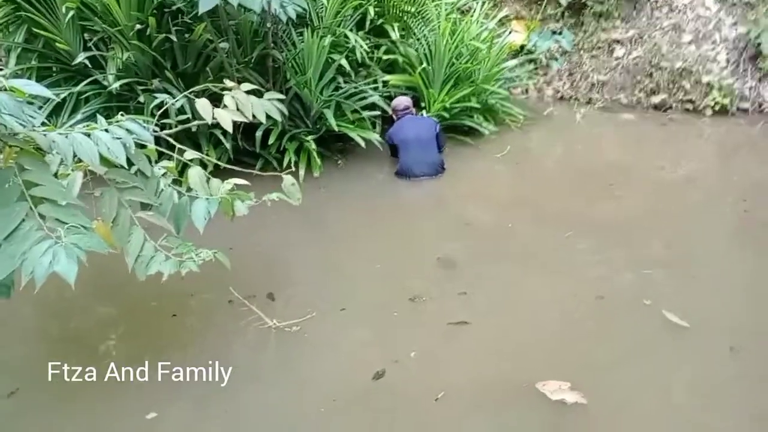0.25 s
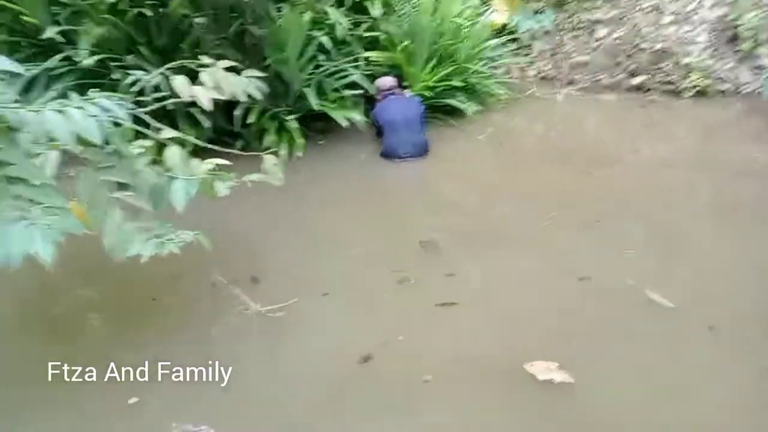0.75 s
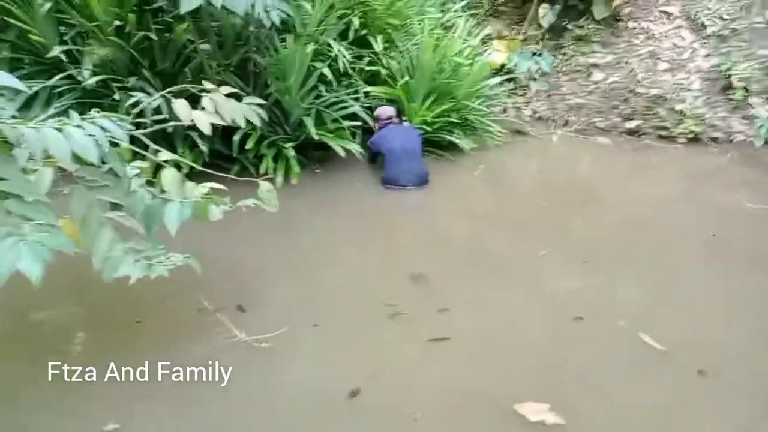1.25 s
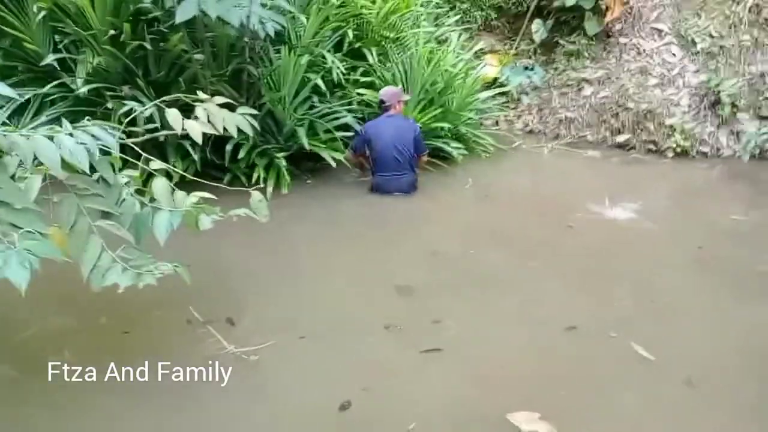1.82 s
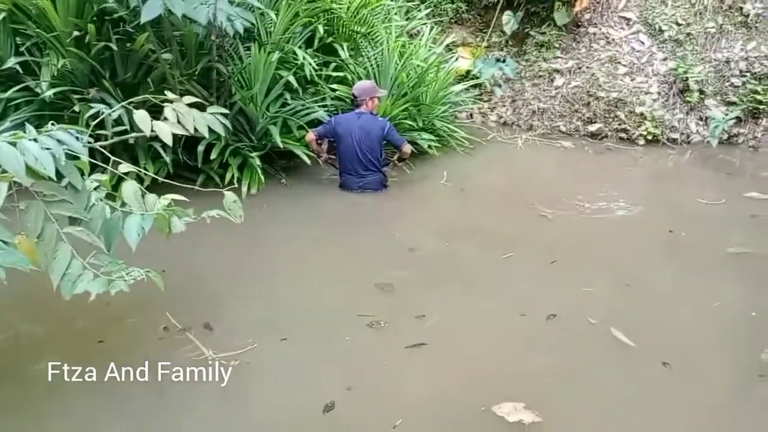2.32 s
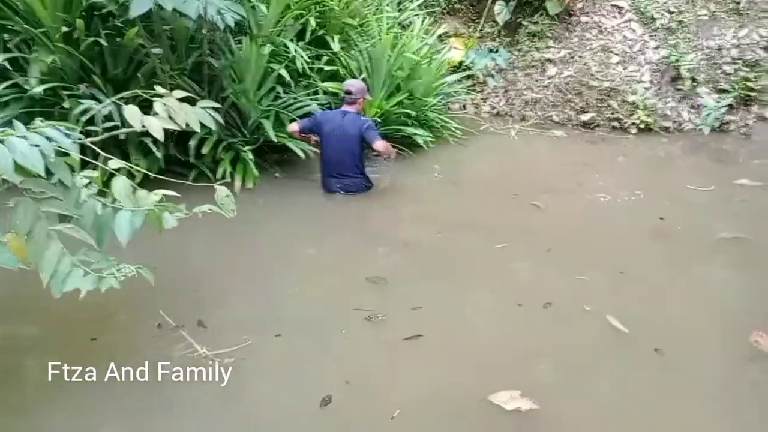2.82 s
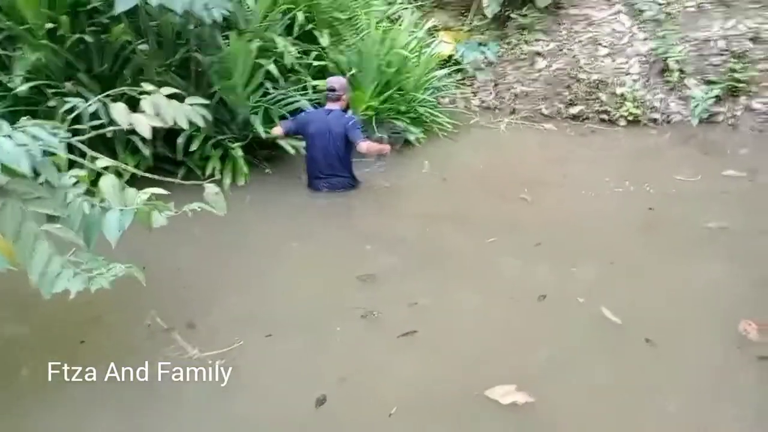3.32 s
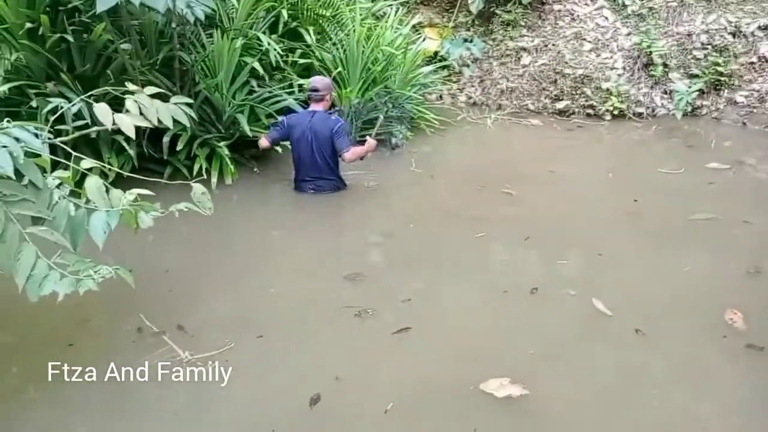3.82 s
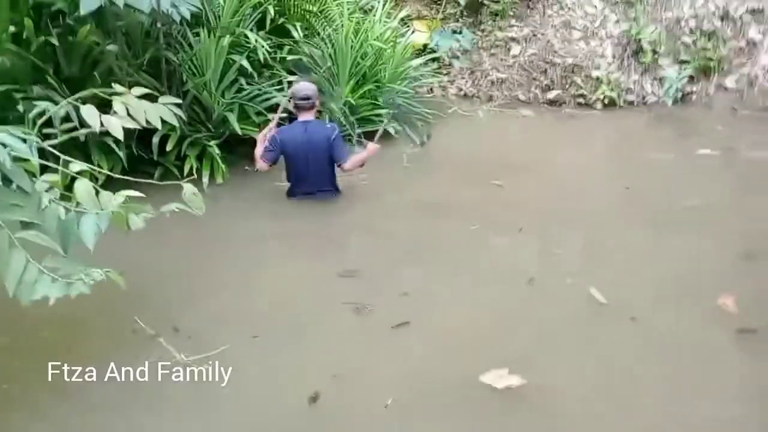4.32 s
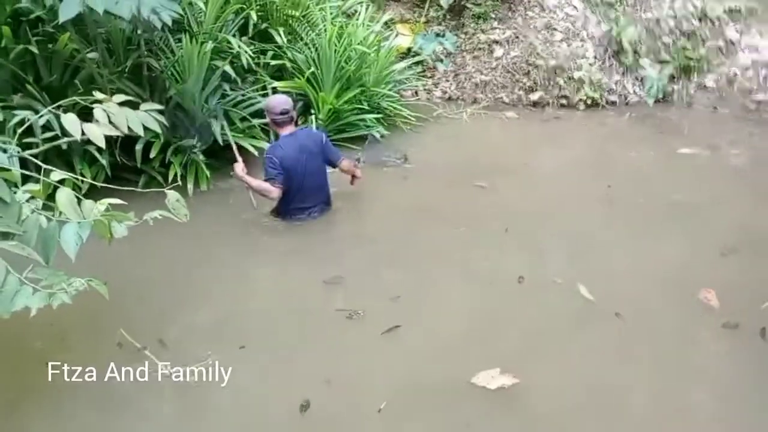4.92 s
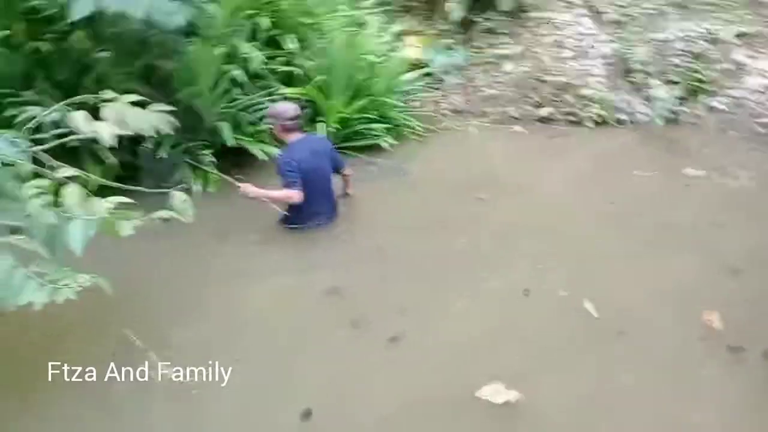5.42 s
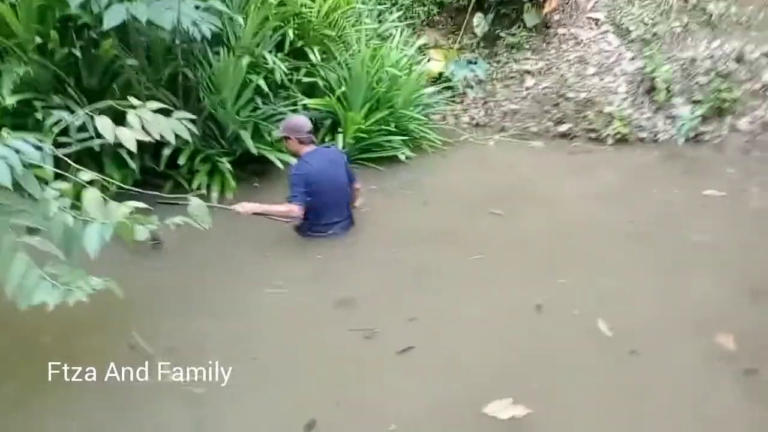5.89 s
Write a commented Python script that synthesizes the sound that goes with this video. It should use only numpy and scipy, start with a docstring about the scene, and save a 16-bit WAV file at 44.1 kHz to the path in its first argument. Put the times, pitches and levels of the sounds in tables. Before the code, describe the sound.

Outdoors at a pond, a very fast, thin cricket trill runs throughout at high pitch, over a blurred insect chorus, rasping trills and a katydid buzz swelling about twice a second. From 0 to 1 s only small clear drops plink over a faint trickle, with a few tiny far chirps. At 1.1-1.4 s the wader's splashes come in a quick cluster with ringing bubbles; a sharper wet snap at 1.56 s leads into gulping splashes until 2 s, mixed with soft low finger thuds. Water then swirls gently with sparse drips. Close handling knocks strike at 2.4 and 3.1 s. Stirring and light splashes return from 3.4 s; a hard knock lands at 4.23 s, more splashing around 4.5 s, another knock at 4.8 s. A bright plop rings at 5.13 s, then a rattle of knocks peaks in the loudest dull thump at 5.45 s. Low bumps and rubbing fade over quiet trickling to 6.1 s.

```python
"""Crickets, trills and a katydid hum high in the plants, while water trickles and single drops ring out.
Someone wades waist-deep in a pond and works a hand net along the bank: swirls, splashes, wet snaps.
A faint far cricket chirps; at the microphone, fingers thud, knock and rub on the hand-held camera.
Insects are short sliding tones and bands of noise, water is ringing bubbles and shaped noise,
and handling is band-passed clicks and a few damped modes of the camera case."""
import sys
import numpy as np
from scipy import signal
from scipy.fft import rfft, irfft
from scipy.io import wavfile

SR = 44100
rng = np.random.default_rng(int(sys.argv[2]) if len(sys.argv) > 2 else 0)


def put_to_file(sound):
    """Save the sound as 16-bit audio at rate SR, in the file named by the first command-line argument."""
    columns = np.atleast_2d(sound).T  # one column per channel
    safe = np.clip(columns, -1, 1)
    whole_steps = np.round(safe * 32767)
    wavfile.write(sys.argv[1], SR, whole_steps.astype(np.int16))


N = 271215

# single drops and bursting bubbles: (t/s, peak level/dB, f/Hz)
DROP_EVENTS = [(.0297, -38.5, 2090), (0.0973, -35, 2270), (.138, -40, 2400), (0.216, -50, 1450),
               (0.4005, -37.5, 3040), (0.4556, -34.5, 3040), (.7596, -39, 3540), (0.778, -52, 1410),
               (.882, -46.5, 1950), (0.931, -51.5, 1150), (0.9348, -41, 1890), (.934, -43, 3150),
               (1.1405, -25.5, 2130), (1.196, -28, 958), (1.197, -29.5, 2070), (1.2679, -24, 2030),
               (1.311, -33.5, 2370), (1.3496, -28, 2230), (1.5614, -25.5, 4020), (1.634, -27, 372),
               (1.645, -38, 2320), (1.888, -36, 970), (2.176, -36.5, 2450), (2.6802, -32.5, 2450),
               (2.76, -37, 2140), (2.813, -38, 2480), (3.5988, -32.5, 2245), (3.7238, -37, 2260),
               (3.8985, -30, 4120), (4.073, -33.5, 2010), (4.1683, -35, 2300), (4.565, -29, 2320),
               (4.574, -42, 529), (4.596, -26.5, 2240), (4.6153, -36, 2250), (5.0174, -43, 1760),
               (5.0998, -29, 2420), (5.1306, -18.5, 2150), (5.3868, -33.5, 2440), (5.8497, -37, 2280),
               (6.0032, -37, 2440), (6.007, -46, 3240)]
# colour of fizzing, splattering water: (f/Hz, relative level/dB)
WATER_COLOUR = [(600, -16), (1200, -21), (1600, -11), (2000, -4), (2230, 2.5), (2600, -1), (3200, -8.5),
                (4000, -6), (5000, -25), (6000, -23), (10000, -27), (15000, -61)]
# colour of fine spray and of wet snaps: (f/Hz, relative level/dB)
SPRAY_COLOUR = [(1500, -9.5), (3000, -35), (4000, 1), (5500, -8.5), (9500, -6.5), (15000, -19)]


def from_db(db):
    """Decibels to gain."""
    return 10 ** (np.asarray(db) / 20)


def rms_one(x):
    """Scale to unit power."""
    return x / np.sqrt(np.mean(x ** 2) + 1e-20)


def seconds(length):
    """A time axis in seconds."""
    return np.arange(round(length * SR)) / SR


def gain_curve(rows):
    """A curve of (t/s, level/dB) as a gain at every sample."""
    times, levels = np.transpose(rows)
    return from_db(np.interp(np.arange(N) / SR, times, levels))


def add(out, s, sound):
    """Mix a sound in at a time in seconds."""
    i = int(np.clip(round(s * SR), 0, N))
    out[i:i + len(sound)] += sound[:N - i]


def coloured(x, spectrum):
    """Weight a signal by a smooth spectrum, drawn over log frequency; rms 1."""
    hz, db = np.transpose(spectrum)
    log_hz = np.log(np.arange(N + 1) * SR / (2 * N) + 1)
    weight = from_db(np.interp(log_hz, np.log(hz), db))
    return rms_one(irfft(rfft(x, 2 * N) * weight)[:N])


def band_noise(hz, width_hz):
    """Noise in one frequency band; rms 1."""
    sos = signal.butter(2, [hz - width_hz / 2, hz + width_hz / 2], "band", fs=SR, output="sos")
    return rms_one(signal.sosfilt(sos, rng.standard_normal(N)))


def low_pass(x, hz):
    """Soften above a frequency."""
    return signal.sosfilt(signal.butter(2, min(hz, SR / 3), fs=SR, output="sos"), x)


def surge(s, db, rise, t60):
    """An envelope that swells to a crest at s and dies away by 60 dB in t60 seconds."""
    t = np.arange(N) / SR - s
    fall = np.where(t < 0, (t / rise) ** 2, np.log(1000) * t / t60)
    return from_db(db) * np.exp(-np.minimum(fall, 20))


def glide(from_hz, to_hz, length):
    """A soft-edged sliding tone."""
    hz = np.linspace(from_hz, to_hz, round(length * SR))
    return np.hanning(len(hz)) * np.sin(2 * np.pi * np.cumsum(hz) / SR)


def cycles_done(rate_rows):
    """Count the cycles of a rhythm whose tempo drifts."""
    return np.cumsum(np.interp(np.arange(N) / SR, *np.transpose(rate_rows))) / SR


def background_air(level_db=-56):
    """The even hush of the place: steady noise with a smooth spectrum."""
    # colour of the hush: (f/Hz, relative level/dB)
    air_colour = [(25, -38), (60, -2.5), (140, 4.5), (300, -11), (600, -11.5), (1100, -19), (2200, -7.5),
                  (3200, -17), (4300, -16), (5700, -36.5), (8200, -14.5), (10300, -21.5), (12300, -18),
                  (15500, -26.5)]
    return from_db(level_db) * coloured(rng.standard_normal(N), air_colour)


def cricket(top_hz=7560, end_hz=6760, stroke_s=0.0105,
            overtone_db=-19, overtone_top_hz=14700, overtone_end_hz=13000):
    """The nearest cricket: three wing strokes a chirp, each falling in pitch as the wing slows."""
    # tempo: (t/s, chirps per s)
    chirp_rate = [(0, 19.3), (1.1, 19.3), (1.5, 18.6), (1.9, 19.4), (5.15, 19.38), (5.4, 18.4),
                  (5.65, 19.4), (6.15, 19.4)]
    # wing strokes in one chirp: (delay t/s, level/dB of the main tone's peak before a small scatter)
    strokes = [(0, -44), (0.0106, -40), (.022, -41.5)]
    out = np.zeros(N)
    chirps = cycles_done(chirp_rate)
    for start in np.flatnonzero(np.diff(np.floor(chirps), prepend=-1)) / SR:
        for delay, db in strokes:
            detune, late, strength, rasp = rng.standard_normal(4)
            pitch = 1 + 0.0093 * detune
            tone = glide(top_hz * pitch, end_hz * pitch, stroke_s)
            overtone = glide(overtone_top_hz * pitch, overtone_end_hz * pitch, stroke_s)
            stroke = tone + from_db(overtone_db + 2 * rasp) * overtone
            add(out, start + delay + 0.00037 * late, from_db(db + 0.18 * strength) * stroke)
    return out


def flutter(rate):
    """A random wobble through unit-spread points, rate points a second."""
    knots = rng.standard_normal(4000)
    return np.interp(np.arange(N) / SR * rate, np.arange(len(knots)), knots)


def stridulation(per_s, from_hz, to_hz, length, uneven=.12):
    """An insect draws its wing over the file, one short sliding tone a stroke; rms 1."""
    out = np.zeros(N)
    for k, (late, detune, strength) in enumerate(rng.standard_normal((int(per_s * N / SR), 3))):
        pitch = 1 + .005 * detune
        stroke = from_db(2 * strength) * glide(from_hz * pitch, to_hz * pitch, length)
        add(out, (k + uneven * late) / per_s, stroke)
    return rms_one(out)


def phrases(rows, fade_s=0.14, between_db=-73.5):
    """A trill fades in, holds and fades out; others of its kind go on further off."""
    t = np.arange(N) / SR
    held = np.zeros(N)
    for start, end, db in rows:
        held += from_db(db) * np.clip(.5 + np.minimum(t - start, end - t) / fade_s, 0, 1)
    return np.hypot(held, from_db(between_db))


def buzzes(head_start=.5, rest=0.16, swell=0.45, stop=0.054):
    """The katydid's level: it rests, swells, holds and stops short; settings are shares of a cycle."""
    # tempo: (t/s, buzzes per s)
    buzz_rate = [(0, 1.845), (3.4, 1.845), (3.6, 1.96), (4.45, 1.96), (4.6, 1.7)]
    # strength of the held buzz: (t/s, level/dB)
    buzz_level = [(0, -63), (2.9, -65.5), (4.5, -62.5), (6.15, -63.5)]
    phase = (cycles_done(buzz_rate) + head_start) % 1
    bout = np.clip(np.minimum((phase - rest) / swell, (1 - phase) / stop), 0, 1)
    return gain_curve(buzz_level) * bout


def far_insects(second_cricket_db=-58):
    """A blurred chorus with one cricket standing out, two rasping trills and a buzzing katydid."""
    # bands of the far chorus: (f/Hz, width f/Hz, level/dB that a flutter varies)
    chorus_bands = [(6607, 390, -59.5), (7185, 410, -55.5), (13040, 400, -82), (14100, 920, -69.5)]
    # phrases of the lower trill: (start t/s, end t/s, level/dB)
    low_phrases = [(-.1, .74, -62), (.92, 1.98, -65), (2.2, 3.45, -63), (3.5, 4.0, -65),
                   (4.12, 4.72, -61.5), (4.82, 5.2, -65), (5.4, 5.98, -67)]
    # phrases of the higher trill: (start t/s, end t/s, level/dB)
    high_phrases = [(.8, 3.42, -63.5), (4.42, 6.3, -64.5)]
    chorus = sum(from_db(db + 2 * flutter(120)) * band_noise(hz, width) for hz, width, db in chorus_bands)
    second = stridulation(per_s=68, from_hz=7200, to_hz=6410, length=0.0091, uneven=.3)
    low_trill = stridulation(per_s=220, from_hz=5250, to_hz=4620, length=0.013, uneven=0.41)
    high_trill = stridulation(per_s=190, from_hz=9450, to_hz=9040, length=0.0083, uneven=0.16)
    rasp = stridulation(per_s=160, from_hz=11450, to_hz=11350, length=.007)
    rasp += .5 * band_noise(hz=11100, width_hz=250)
    trills = phrases(low_phrases) * low_trill + phrases(high_phrases) * high_trill
    return chorus + from_db(second_cricket_db) * second + trills + buzzes() * rasp


def bubble(hz, cycles, climb):
    """A trapped bubble rings down, its pitch climbing as it surfaces."""
    age = seconds(cycles / hz) * hz / cycles   # 0 to 1 over its life
    tone = np.sin(2 * np.pi * cycles * age * (1 + climb * (age / 2 - 1 / 6)))
    return tone * np.exp(-np.log(1000) * age) * (1 - np.exp(-20 * age))


def bubbles(per_s, low_hz, high_hz, cycles, spread_db, hiss, climb=0.033):
    """Bubbles of random size and strength, over a chosen share of hiss for countless smaller ones."""
    out = np.zeros(N)
    born = np.flatnonzero(rng.random(N) < per_s / SR)
    for i, (size, strength, depth) in zip(born, rng.random((len(born), 3))):
        db = spread_db * min(-np.log(1 - strength), 3)
        hz = low_hz * (high_hz / low_hz) ** size
        add(out, i / SR, from_db(db) * bubble(hz, cycles * (.5 + depth), climb))
    return rms_one(out) + hiss * rng.standard_normal(N)


def wading():
    """Legs and net stir the water; splashes throw fine spray and trap larger pockets of air."""
    # how hard the water is stirred: (t/s, level/dB)
    swirl = [(0.0, -57), (0.12, -55), (0.84, -60.5), (1.18, -51.5), (1.27, -60.5), (1.57, -43.5),
             (1.73, -60), (1.85, -50.5), (2.0, -48), (2.23, -53.5), (3.36, -52), (3.51, -48.5),
             (4.09, -49.5), (4.5, -46.5), (4.95, -52), (5.1, -56), (5.29, -49), (6.15, -58)]
    # splashes: (crest t/s, level/dB, t60/s, spray share, share of trapped air)
    splashes = [(1.109, -38.5, 0.065, .1, 0.3), (1.143, -34.5, 0.15, 0.19, 0.45),
                (1.166, -32, 0.07, 0.21, 0.42), (1.208, -46.5, 0.18, 0.073, 0.43),
                (1.264, -39.5, 0.12, 0.14, 0.31), (1.353, -56, .25, .13, .1), (1.56, -38, 0.12, .62, 0.15),
                (1.648, -37.5, 0.061, .35, 1), (1.671, -32, 0.22, 0.29, 0.53), (1.81, -44.5, 1, .1, 0.64),
                (1.953, -41, 0.1, .44, 0.37), (3.397, -41, 0.21, 0.48, 0.13),
                (3.481, -42, 0.25, 0.66, 0.03), (4.34, -42.5, 0.47, 0.54, 0.058),
                (4.486, -38.5, 0.14, 0.14, 0.092), (4.573, -45, 0.045, 0.17, 0.031),
                (4.654, -38, 0.04, .37, 0.063), (5.135, -25, 0.095, 0.023, 0.084),
                (5.91, -47.5, 1, 0.33, 0.3)]
    # colour of the small trickling bubbles: (f/Hz, relative level/dB)
    trickle_colour = [(800, 1), (1400, -14.5), (1900, -1.5), (2280, 7), (2700, -3), (3300, -1),
                      (4100, -2.5), (5200, -6.5), (7000, -14), (15000, -18)]
    # colour of the large air pockets: (f/Hz, relative level/dB)
    pocket_colour = [(35, -1), (100, 21), (300, -4), (550, 1.5), (850, 13.5), (1050, 11.5), (1300, 0.5),
                     (2000, -8.5)]
    trickle_db, gurgle_db, stray_db = -2.5, -12.5, -10   # relative to the stirring
    wake_db, wake_rise_s, wake_t60_s = -24, 0.0017, 0.3   # bubbles each drop stirs up, against its peak
    rise_share = 0.083   # of t60: a longer splash also builds more slowly
    gulp_rise_s, gulp_t60_s = 0.0063, 0.25   # the trapped air comes up

    fizz = bubbles(per_s=2000, low_hz=898, high_hz=7150, cycles=25, spread_db=3.5, hiss=0.65)
    fizz = coloured(fizz, WATER_COLOUR)
    trickle = bubbles(per_s=750, low_hz=1200, high_hz=5800, cycles=38, spread_db=3.8, hiss=.55)
    trickle = coloured(trickle, trickle_colour)
    spray = bubbles(per_s=650, low_hz=3000, high_hz=14300, cycles=3.5, spread_db=4, hiss=0.4)
    spray = coloured(spray, SPRAY_COLOUR)
    pockets = bubbles(per_s=300, low_hz=228.0, high_hz=1540, cycles=11.4, spread_db=3.5, hiss=1.0)
    pockets = coloured(pockets, pocket_colour)
    # faint drips from the net and the arms
    strays = bubbles(per_s=55, low_hz=1983, high_hz=4260, cycles=35, spread_db=-1.5, hiss=0)

    stirring = gain_curve(swirl)
    wakes = sum(surge(s, db + wake_db, wake_rise_s, wake_t60_s) for s, db, hz in DROP_EVENTS)
    out = np.hypot(from_db(trickle_db) * stirring, wakes) * trickle
    out += stirring * (from_db(gurgle_db) * pockets + from_db(stray_db) * strays)
    for s, db, t60, spray_share, air_share in splashes:
        burst = (fizz + spray_share * spray) / np.hypot(1, spray_share)
        out += surge(s, db, rise_share * t60, t60) * burst
        out += air_share * surge(s, db, gulp_rise_s, gulp_t60_s) * pockets
    return out


def drops(cycles=48, climb=0.37, splat=0.18, splat_s=0.024, longest_s=0.08):
    """Each drop traps one clear bubble, with a little wet splatter."""
    out, t = np.zeros(N), seconds(.1)
    splatter = coloured(rng.standard_normal(N), WATER_COLOUR)
    for k, (s, db, hz) in enumerate(DROP_EVENTS):
        tone = bubble(hz, min(cycles, longest_s * hz), climb)   # big bubbles burst before they ring out
        add(out, s, from_db(db) * tone / np.abs(tone).max())
        piece = splatter[k * len(t):(k + 1) * len(t)]   # fresh noise for each drop
        add(out, s, from_db(db) * splat * piece * np.exp(-t / splat_s))
    return out


def bank_echo(x, t60=0.18, echo_db=-11):
    """The bank and the leaves scatter a short dull tail."""
    t = seconds(.4)
    tail = low_pass(rng.standard_normal(len(t)), 8100)
    tail = tail * np.exp(-np.log(1000) * t / t60) * (t > .006)   # starts after 6 ms
    return x + from_db(echo_db) * signal.fftconvolve(x, tail / np.linalg.norm(tail))[:N]


def far_chirps(gap_s=.036):
    """A far cricket's thin falling chirps, in quick runs."""
    # runs of chirps: (start t/s, end t/s, peak level/dB)
    runs = [(0.49, .535, -56), (.643, .732, -56), (.88, .972, -57)]
    out = np.zeros(N)
    for start, end, db in runs:
        for s in np.arange(start, end, gap_s):
            add(out, s, from_db(db) * glide(from_hz=5900, to_hz=5000, length=0.021))
    return out


def ring(clicks, hz, t60):
    """A unit click sets a sine ringing, its height starting from 1."""
    r, w = np.exp(-np.log(1000) / (t60 * SR)), 2 * np.pi * hz / SR
    return signal.lfilter([0, np.sin(w)], [1, -2 * r * np.cos(w), r * r], clicks + 1e-18)


def case(force, grip):
    """The camera case rings in a few damped modes, higher when gripped hard; it carries little bass."""
    # modes of the case: (f/Hz before the grip factor, relative level/dB, t60/s)
    modes = [(154, -11, 0.14), (223, 8, 0.018), (320, -7, 0.031), (458, 0.5, 0.02), (632, 9.5, 0.0099),
             (796, -23, 0.0063), (1370, -6.5, 0.0059), (2080, 1.5, 0.015), (3020, 7, 0.0034)]
    body = sum(from_db(db) * ring(force, hz * grip, t60) for hz, db, t60 in modes)
    return signal.sosfilt(signal.butter(2, 95, "high", fs=SR, output="sos"), body)


def thud(db, hz, width=1.393):
    """A finger pad lands: a few dull swings in a band from hz / width to hz * width."""
    sos = signal.butter(3, [hz / width, hz * width], "band", fs=SR, output="sos")
    swing = signal.sosfilt(sos, signal.unit_impulse(SR // 8))
    return from_db(db) * swing / np.abs(swing).max()


def presses_and_knocks(skin_pad_hz=4500, thud_hz=145.7):
    """Fingers press softly or knock on the case; their soft pads take the edge off."""
    # soft finger presses: (t/s, peak level/dB, f/Hz)
    presses = [(1.299, -31, 95.5), (1.32, -29, 124), (1.343, -34, 128), (1.408, -30, 135),
               (1.422, -35, 200), (1.434, -29, 140), (1.481, -25, 155), (1.666, -26, 120),
               (1.788, -25, 125), (1.861, -26.5, 128), (2.517, -42, 138), (2.637, -43, 124),
               (2.898, -42.5, 144), (3.269, -26.5, 115), (3.333, -39.5, 109), (3.398, -40, 158),
               (4.384, -24.5, 123), (4.502, -29.5, 149), (4.795, -29, 107), (4.961, -31, 137),
               (4.995, -28.5, 104), (5.681, -31.5, 130), (5.718, -21, 86), (5.911, -21.5, 100)]
    # a finger knocks and lands on its pad:
    # (t/s, knock peak level/dB, hardness f/Hz, grip as pitch factor of the case, pad peak level/dB)
    knocks = [(2.4023, -18, 5500, 0.77, -20.5), (3.1267, -11, 1470, 1.04, -35),
              (4.2263, -16, 6000, 0.89, -36), (4.2341, -2.5, 1630, 1.16, -8.5),
              (4.8159, -12, 1730, 1.15, -38), (5.314, -28.5, 1090, 1.2, -50),
              (5.3275, -19, 1190, 1.04, -48), (5.3384, -16, 1090, 1.02, -47),
              (5.3869, -22.5, 1470, 0.94, -32), (5.4464, 0.5, 730, 0.99, -6.5),
              (5.4496, -7, 593, 0.79, -20), (5.4625, -15.5, 695, 0.66, -50), (5.528, -27, 985, 0.84, -37)]
    out, click = np.zeros(N), signal.unit_impulse(SR // 8)
    for s, db, hz in presses:
        add(out, s, thud(db, hz))
    for s, db, hardness_hz, grip, pad_db in knocks:
        knock = case(low_pass(low_pass(click, hardness_hz), skin_pad_hz), grip)
        add(out, s, from_db(db) * knock / np.abs(knock).max() + thud(pad_db, thud_hz))
    return out


def rubs(slips_per_s=1200, skin_hz=1500, slip_low_hz=110, rise_share=0.24):
    """Skin slips over the case in countless tiny jerks that set it ringing."""
    # slips: (crest t/s, level/dB, t60/s); each swells for rise_share of its t60
    slides = [(1.47, -45, .13), (1.674, -35, 0.16), (1.822, -40, 0.16), (2.41, -29.5, 0.088),
              (3.133, -23, .068), (4.228, -18.5, 0.031), (4.814, -25, 0.055), (4.834, -24.5, 0.065),
              (5.335, -28.5, 0.048), (5.464, -36, 0.098), (5.822, -42.5, 0.4), (5.92, -52, 0.27)]
    slips = rng.choice([-1, 1], N) * (rng.random(N) < slips_per_s / SR)
    slips = signal.sosfilt(signal.butter(1, slip_low_hz, "high", fs=SR, output="sos"), slips)
    sliding = sum(surge(s, db, rise_share * t60, t60) for s, db, t60 in slides)
    return sliding * rms_one(case(low_pass(slips, skin_hz), grip=0.993))


def snaps():
    """Water slapping on water gives a very short, bright crack."""
    # sharp wet snaps at the surface: (t/s, level/dB, t60/s)
    slaps = [(1.5621, -35, 0.031), (2.797, -45, 0.019), (3.898, -63, 0.02), (4.655, -40.5, 0.014),
             (5.1315, -50, 0.0088)]
    crack = coloured(rng.standard_normal(N), SPRAY_COLOUR)
    return crack * sum(surge(s, db, rise=0.0003, t60=t60) for s, db, t60 in slaps)


def scene():
    """Insects and pond at a distance, and the hand on the camera close by."""
    insects = cricket() + far_insects()
    pond = bank_echo(wading() + drops() + snaps())
    chirps = bank_echo(far_chirps(), t60=0.25, echo_db=-11)
    handling = presses_and_knocks() + rubs()
    return (background_air() + insects + pond + chirps + handling)[None]


def record(dry):
    """The microphone's deepest bass is lost and the top is cut steeply."""
    thin = signal.sosfilt(signal.butter(2, 40, "high", fs=SR, output="sos"), dry)
    cutoff_hz = 15600
    return signal.sosfilt(signal.ellip(12, .1, 90, cutoff_hz, fs=SR, output="sos"), thin)


dry = scene()
out = record(dry)
put_to_file(out)
```